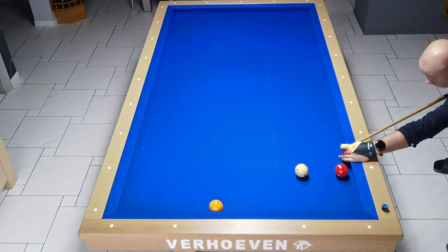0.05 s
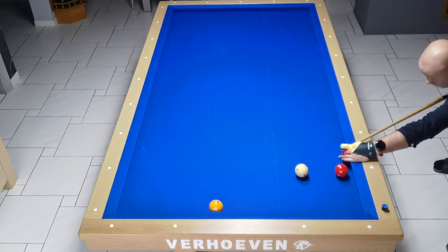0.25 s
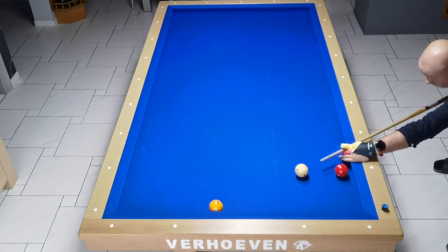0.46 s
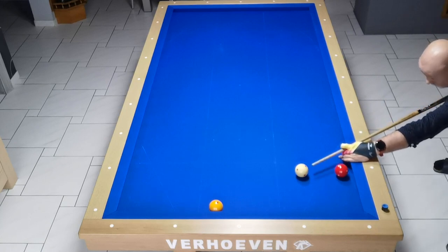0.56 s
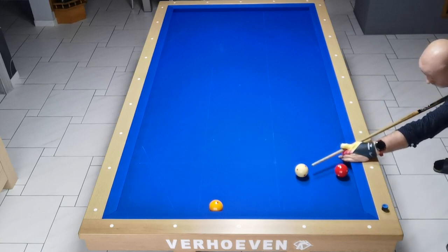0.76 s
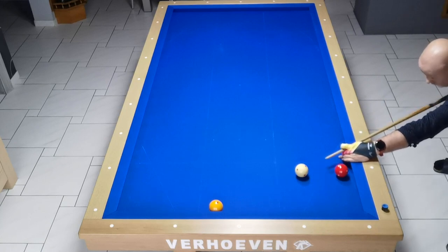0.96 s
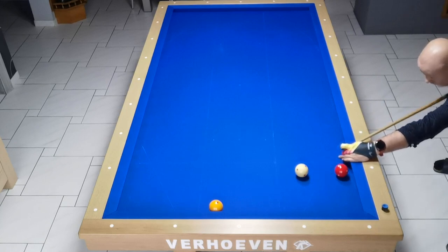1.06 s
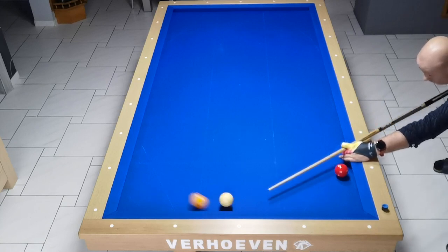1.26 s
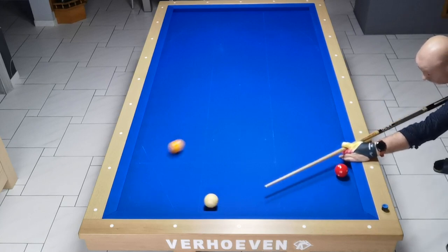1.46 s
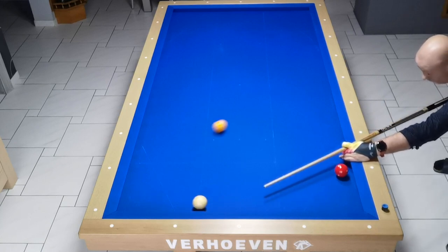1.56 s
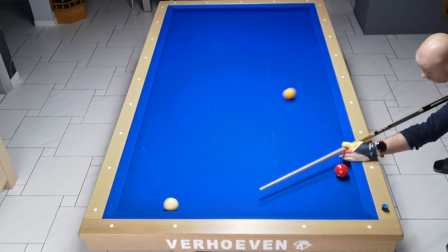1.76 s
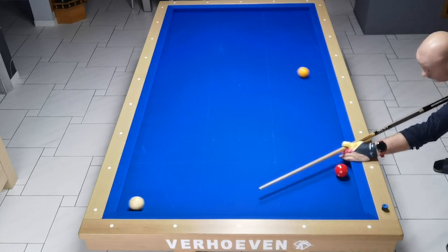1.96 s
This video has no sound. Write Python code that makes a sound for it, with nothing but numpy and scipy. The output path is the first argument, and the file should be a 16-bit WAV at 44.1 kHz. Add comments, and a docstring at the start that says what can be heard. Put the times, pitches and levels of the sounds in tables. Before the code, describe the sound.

Billiard balls clack together once, sharp and bright, just after a cue tip knocks the first ball. A few softer cushion thuds follow, then a faint rolling rumble on cloth, heard from nearby in a reverberant tiled room.

```python
"""Two balls clack together in a carom shot in a tiled room. Just before, the cue slides through
the gloved bridge hand and its tip knocks the cue ball. Both balls then thud into the cushions
and rumble on over the cloth. Each impact is a short pulse followed by the reverberation of
the hard room, above faint air noise and a low mains hum."""
import sys
import numpy as np
from scipy import signal
from scipy.fft import irfft
from scipy.io import wavfile

SR = 44100
rng = np.random.default_rng(int(sys.argv[2]) if len(sys.argv) > 2 else 0)


def put_to_file(sound):
    """Save the sound as 16-bit audio at rate SR, in the file named by the first command-line argument."""
    columns = np.atleast_2d(sound).T  # one column per channel
    safe = np.clip(columns, -1, 1)
    whole_steps = np.round(safe * 32767)
    wavfile.write(sys.argv[1], SR, whole_steps.astype(np.int16))


N = 88596
CUE_S = 1.2907  # the tip meets the cue ball


def collision():
    """Elastic impact: brief contact makes a bright clack; early reflections and reverberation follow."""
    # ball against ball, direct and off the table: start_s, level_db, left_right_db, right_lag_s
    clack_paths = [(1.3727, 0, 8, 0.0053), (1.3739, 0, -0.5, 0)]
    # duller slaps from hard surfaces: start_s, level_db, left_right_db, right_lag_s
    slap_paths = [(1.3794, 1, 5.5, .0004), (1.3805, 9.5, 2.5, .0004), (1.3854, -2, 4, .0002),
                  (1.4053, -7.5, -2.5, .0002)]
    # spectra of the clack, a slap and the sound sent into the room: frequency_hz, relative_db
    clack_spectrum = [(200, -25.5), (500, -5.5), (1400, 6), (2100, -4), (3200, 3.5), (3900, -1),
                      (5600, -30.5), (7000, -10.5), (8100, -35.5), (9300, -9.5), (11200, -25),
                      (13100, -4.5), (16000, -31)]
    slap_spectrum = [(200, -49), (700, -23), (1400, -3), (2150, -2.5), (2800, -8.5), (3800, -28),
                     (5500, -50), (9000, -42.5), (11300, -30.5), (13200, -34), (16000, -54)]
    room_spectrum = [(150, -25.5), (500, -11.5), (1000, -12.5), (1300, -6), (1600, -3.5), (2000, 6),
                     (2550, 0.5), (3300, -7), (4200, -18.5), (5600, -36), (7200, -26), (8400, -41),
                     (9500, -26), (10600, -28.5), (11500, -42), (12600, -20.5), (13500, -29),
                     (14200, -47.5), (16000, -61.5)]
    out = np.zeros((2, N))
    for paths, spectrum in ((clack_paths, clack_spectrum), (slap_paths, slap_spectrum)):
        pulse = -click(spectrum)
        for start_s, level_db, left_right_db, right_lag_s in paths:
            arrival = pan(left_right_db) * amp(level_db) * pulse
            add(out[:1], start_s, arrival[:1])
            add(out[1:], start_s + right_lag_s, arrival[1:])
    add(out, start_s=1.376, sound=amp(13.5) * reverberation(room_spectrum, build_s=.011))
    return out


def cue_strike():
    """Impulse excitation: the leather tip ticks, and shaft, ball and table ring in damped modes."""
    # knock of shaft and ball, then the slower ring of the table: pitch_hz, level_db, swell_s, t60_s
    modes = [(791, -6.5, .0023, 0.0062), (640.6, -17, .002, 0.038), (2221, -21, 0.0034, .03),
             (255.3, -29, 0.0026, 0.036), (340.6, -31, 0.033, .1), (620, -30, 0.064, 0.086),
             (735, -31, 0.1, 0.1)]
    # spectra of the tip's tick and the sound sent into the room: frequency_hz, relative_db
    tip_spectrum = [(60, -14.5), (200, 8), (400, 4), (1000, 0), (1700, -11.5), (3000, -3.5), (6000, -9.5),
                    (11000, -11), (16000, -28)]
    room_spectrum = [(40, -22.5), (150, -10.5), (350, -5), (510, -6.5), (640, -2), (870, -1), (1100, -6),
                     (1650, -13), (2200, -2.5), (3200, -11), (4300, -22), (5400, -19.5), (6900, -29),
                     (10000, -27.5), (13000, -34.5), (14500, -45.5), (16000, -61)]
    out, t = np.zeros((2, N)), np.arange(SR // 2) / SR
    position = pan(left_right_db=4)
    for pitch_hz, level_db, swell_s, t60_s in modes:
        swell = np.minimum(t / swell_s, 1)
        decay = amp(level_db - 60 * np.maximum(t - swell_s, 0) / t60_s)
        add(out, CUE_S, position * swell * decay * np.sin(2 * np.pi * pitch_hz * t))
    add(out, CUE_S, position * amp(-7) * click(tip_spectrum))
    add(out, CUE_S, amp(8.5) * reverberation(room_spectrum, build_s=.00067))
    return out


def cushion_rebounds():
    """Compliant impact: soft rubber thuds and the wooden rail knocks, heard mostly through the room."""
    # balls meeting the cushions: start_s, thud_db, knock_db
    rebounds = [(1.378, -7.5, -2.5), (1.455, -10, 0.5), (1.508, -2.5, -1), (1.574, -6.5, -11),
                (1.605, -9, -15.5), (1.71, -22, -46)]
    # spectra of the rubber and the rail: frequency_hz, relative_db
    thud_spectrum = [(25, -10.5), (62, -2), (95, -13), (150, -2.5), (240, 5.5), (330, -4.5), (500, -9.5),
                     (1500, -33.5), (10000, -90.5)]
    knock_spectrum = [(100, -38.5), (270, -11.5), (510, -13), (700, -2), (870, -8), (1050, -17.5),
                      (1250, -8.5), (1800, -15), (5000, -44.5), (14000, -82)]
    out, direct_db = np.zeros((2, N)), -5
    for start_s, thud_db, knock_db in rebounds:
        for spectrum, level_db in ((thud_spectrum, thud_db), (knock_spectrum, knock_db)):
            add(out, start_s, pan(0) * amp(level_db + direct_db) * click(spectrum))
            add(out, start_s, amp(level_db) * reverberation(spectrum, build_s=.0072))
    return out


def shaft_slide():
    """Sliding friction: the shaft hisses over the glove, loudest in the follow-through."""
    # friction noise: frequency_hz, relative_db
    spectrum = [(200, -14), (1500, -7.5), (3000, -0.5), (4300, -3.5), (5300, 4.5), (6050, -1.5), (6700, -8),
                (9500, -10.5), (13000, -10), (16000, -29.5)]
    # course of the stroke: time_s, level_db
    stroke = [(1.17, -90), (1.215, -64.5), (1.288, -61.5), (1.294, -34.5), (1.33, -43), (1.364, -42.5),
              (1.385, -64), (1.42, -85.5)]
    level_db = np.interp(np.arange(N) / SR, *np.transpose(stroke), left=-np.inf, right=-np.inf)
    return amp(level_db) * diffuse(spectrum)


def rolling():
    """Rolling contact: once struck, the balls rumble on cloth over slate."""
    # rolling noise: frequency_hz, relative_db
    spectrum = [(20, -8.5), (42, -5), (64, 1.5), (85, -12), (110, -9.5), (200, -11.5), (400, -20),
                (800, -35), (3000, -52), (12000, -44), (16000, -67)]
    # swell of the rumble: time_s, level_db
    swell = [(1.29, -88), (1.33, -91), (1.68, -50), (1.85, -51.5), (2.01, -51.5)]
    t = np.arange(N) / SR
    return (t > CUE_S) * amp(np.interp(t, *np.transpose(swell))) * diffuse(spectrum)


def reverberation(spectrum, build_s):
    """Reverberant decay: the response to a blow builds up, then each band dies at its own rate."""
    # decay times of the tiled room: frequency_hz, t60_s
    decay_times = [(60, 1), (200, 0.41), (700, 0.65), (2200, 0.75), (4000, 0.79), (8000, 0.51),
                   (13000, 0.41)]
    hz, t, bands = signal.stft(diffuse(spectrum), SR, nperseg=512)
    decay = amp(-60 * t / read(decay_times, hz)[:, None])
    tail = signal.istft(bands * decay, SR, nperseg=512)[1][:, :N]
    tail *= 1 - np.exp(-np.arange(N) / SR / build_s)
    return tail / np.sqrt((tail ** 2).sum() / 2)  # mean energy 1 per channel


def background():
    """Stationary noise floor: broadband room air and the pure tones of mains hum."""
    # room air: frequency_hz, relative_db
    air_spectrum = [(15, 2), (28, -1.5), (40, -6.5), (52, -2), (75, -10), (120, -16), (170, -15),
                    (230, -20), (340, -24), (420, -28.5), (800, -32), (1400, -35), (2800, -35),
                    (6000, -38.5), (11000, -41.5), (12500, -46), (16000, -61)]
    # hum tones: pitch_hz, level_db
    tones = [(100.3, -67.5), (349, -90)]
    t = np.arange(N) / SR
    hum = sum(amp(db) * np.sqrt(2) * np.sin(2 * np.pi * hz * t) for hz, db in tones)
    return amp(-64.5) * diffuse(air_spectrum) + pan(left_right_db=-3.5) * hum


def diffuse(spectrum):
    """Diffuse field: stereo noise of rms 1, coherent in the bass and unrelated in the treble."""
    # likeness of the two channels: frequency_hz, coherence
    likeness = [(60, 1), (300, 0.69), (700, 0.57), (1300, 0.016), (2300, 0.022), (5000, 0), (13000, .1)]
    # level difference between the channels: frequency_hz, left_right_db
    balance = [(50, -3), (150, -2.5), (300, 0.5), (700, 2.5), (2200, 3.5), (6000, 1), (13000, 6)]
    hz = np.fft.rfftfreq(N, 1 / SR)
    left, independent = np.exp(2j * np.pi * rng.random((2, len(hz))))
    coherence = np.clip(read(likeness, hz), -1, 1)
    right = coherence * left + np.sqrt(1 - coherence ** 2) * independent
    noise = irfft(np.array([left, right]) * amp(read(spectrum, hz)) * pan(read(balance, hz)), N)
    return noise / noise.std()


def click(spectrum, size=4096):
    """Minimum phase: the shortest causal pulse with this spectrum, of energy 1."""
    hz = abs(np.fft.fftfreq(size, 1 / SR))
    log_gain = np.log(amp(read(spectrum, hz)))
    response = np.exp(np.conj(signal.hilbert(log_gain)))
    pulse = np.fft.ifft(response).real[:size // 2]
    return pulse / np.linalg.norm(pulse)


def amp(db):
    """Decibels to amplitude ratio."""
    return 10 ** (np.asarray(db) / 20)


def read(points, hz):
    """Interpolation on a log-frequency axis."""
    frequency_hz, value = np.transpose(points)
    return np.interp(np.log(hz + 1), np.log(frequency_hz + 1), value)


def pan(left_right_db):
    """Level-difference panning: left and right gains."""
    return amp(np.array([[.5], [-.5]]) * left_right_db)


def add(mix, start_s, sound):
    """Delay and sum: a sound enters the mix at start_s."""
    part = mix[:, round(start_s * SR):][:, :sound.shape[1]]
    part += sound[:, :part.shape[1]]


def scene():
    """Superposition of the impacts, the friction and the noise floor."""
    impacts = cue_strike() + collision() + cushion_rebounds()
    return impacts + shaft_slide() + rolling() + amp(7.5) * background()


def record(dry):
    """Dynamics and bandwidth: a soft gate lowers quiet sound, a limiter rounds peaks, a low-pass follows."""
    threshold_db, width_db, depth_db, smoothing_s = -37, 3, 7.5, .012
    knee, ceiling = .8, .95
    pole = np.exp(-1 / (smoothing_s * SR))
    power = signal.lfilter([1 - pole], [1, -pole], (dry ** 2).mean(0))
    level_db = 10 * np.log10(power + 1e-12)
    closure = .5 - .5 * np.tanh((level_db - threshold_db) / width_db)
    gated = dry * amp(-depth_db * closure)
    linear, headroom = np.clip(gated, -knee, knee), ceiling - knee
    limited = linear + headroom * np.tanh((gated - linear) / headroom)
    low_pass = signal.firwin(255, cutoff=16300, window=("kaiser", 9), fs=SR)
    return signal.oaconvolve(limited, low_pass[None], "same")


dry = scene()
out = record(dry)
put_to_file(out)
```